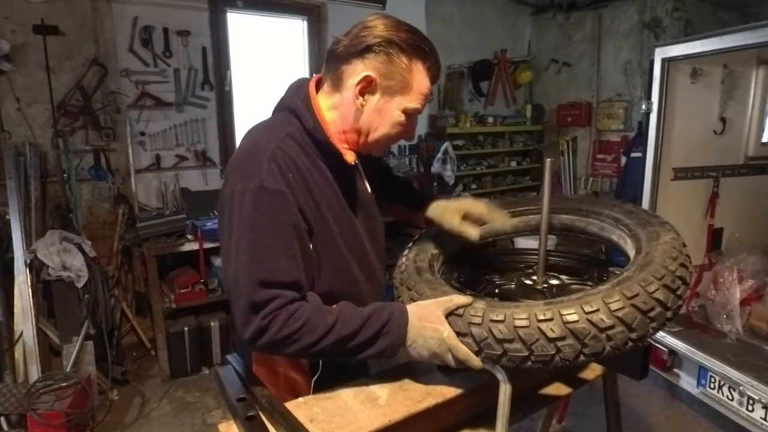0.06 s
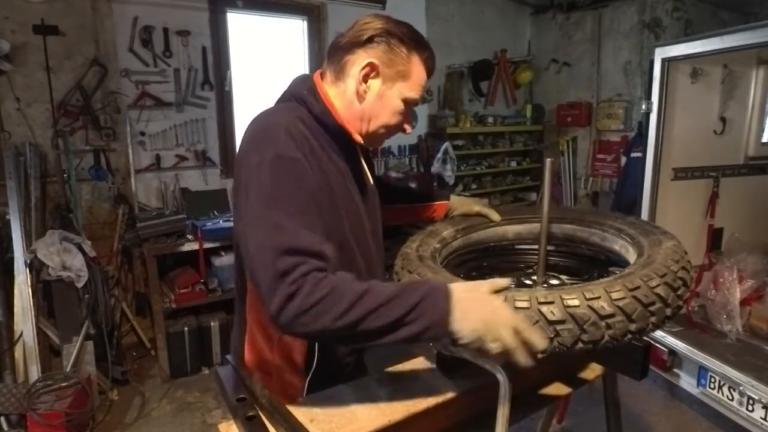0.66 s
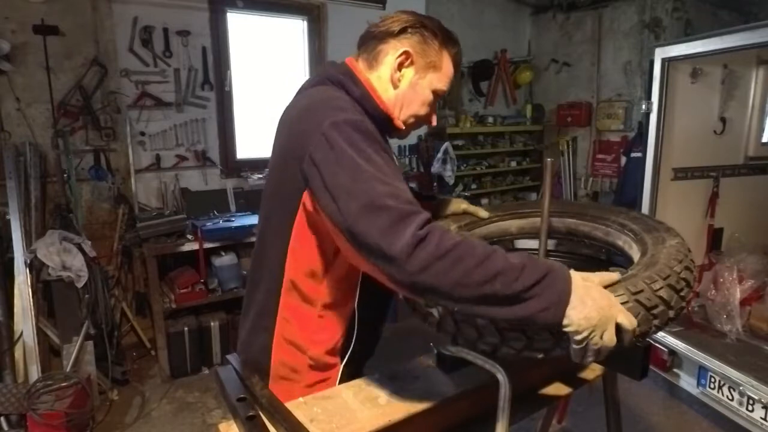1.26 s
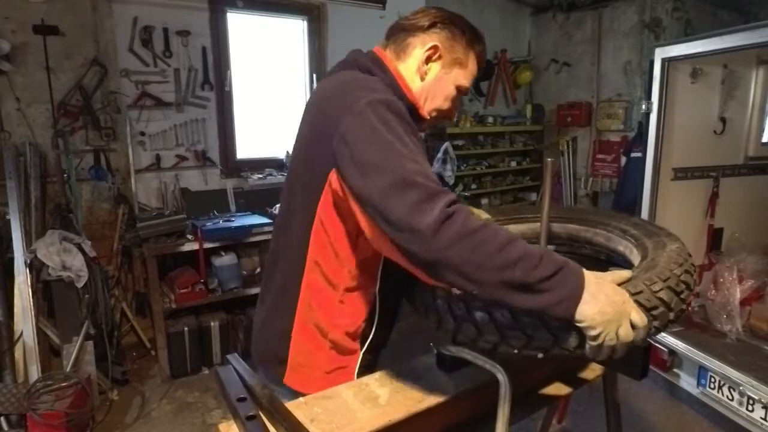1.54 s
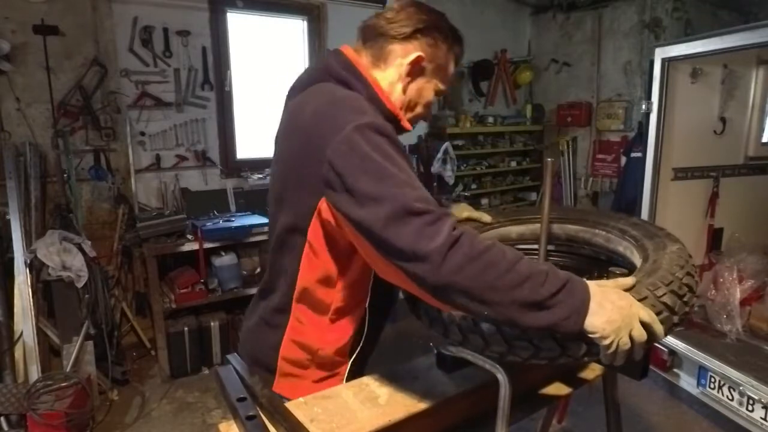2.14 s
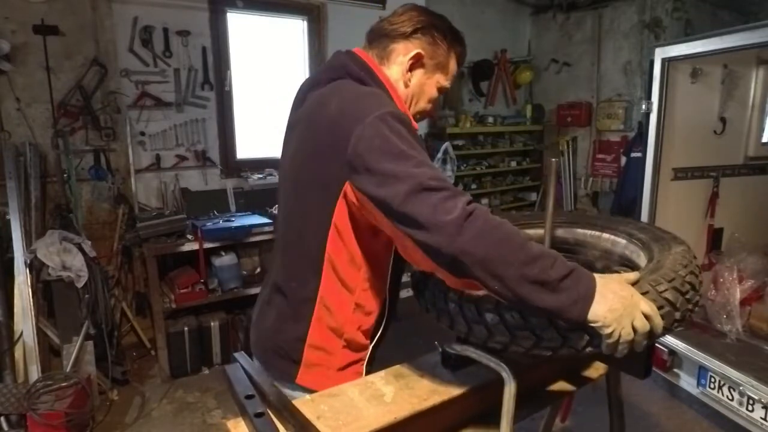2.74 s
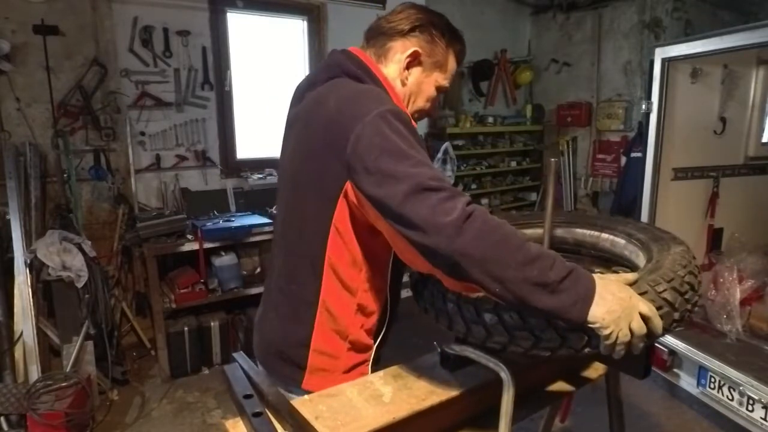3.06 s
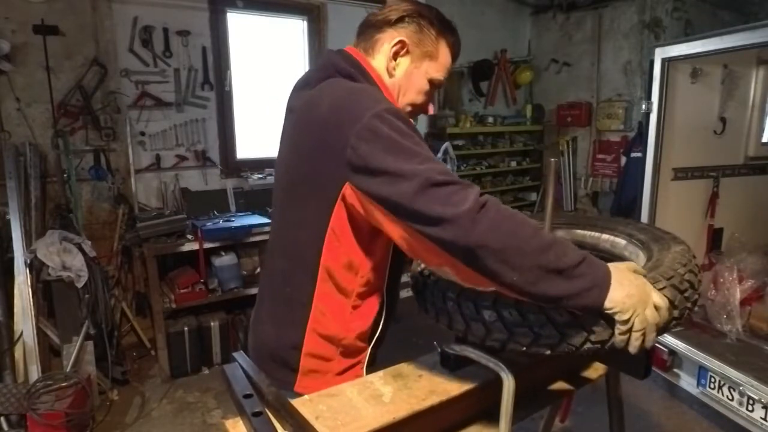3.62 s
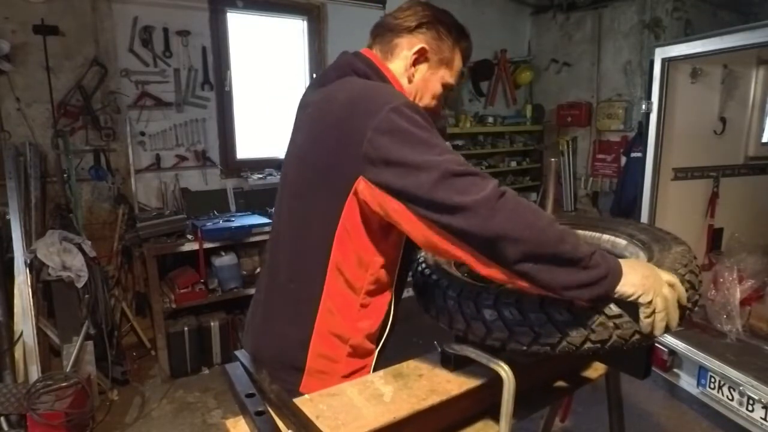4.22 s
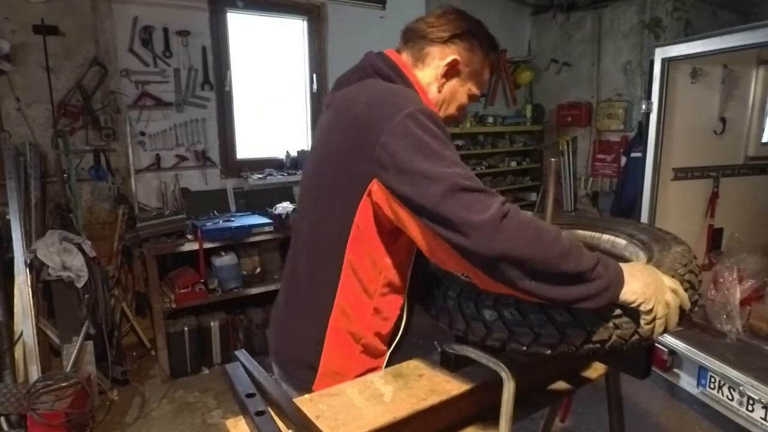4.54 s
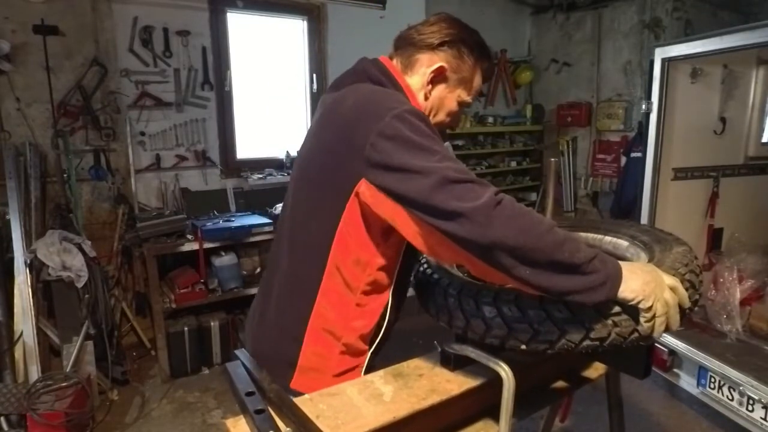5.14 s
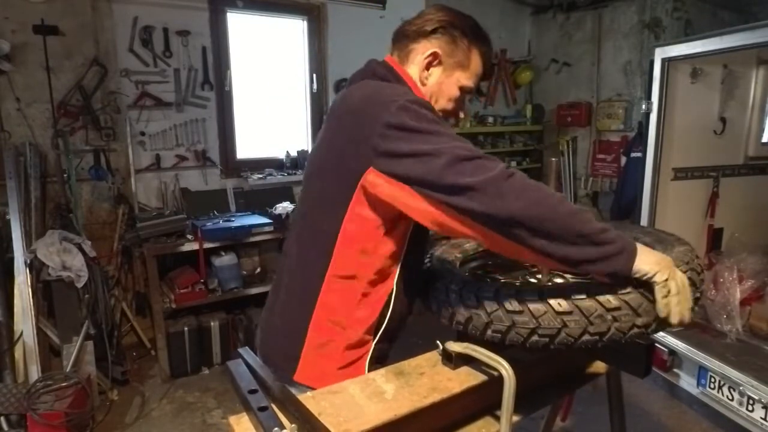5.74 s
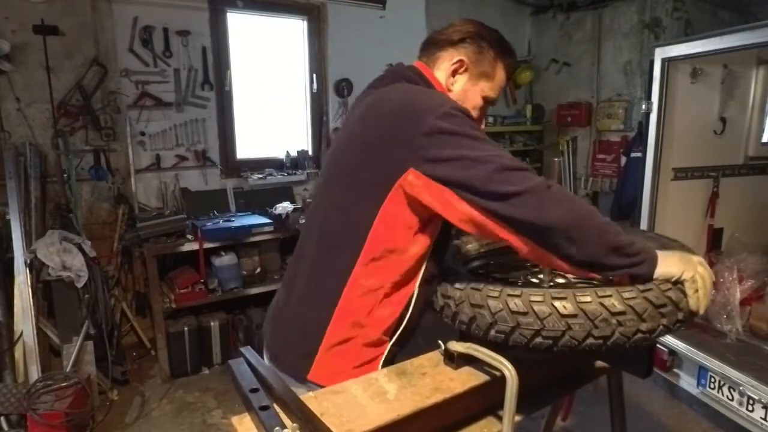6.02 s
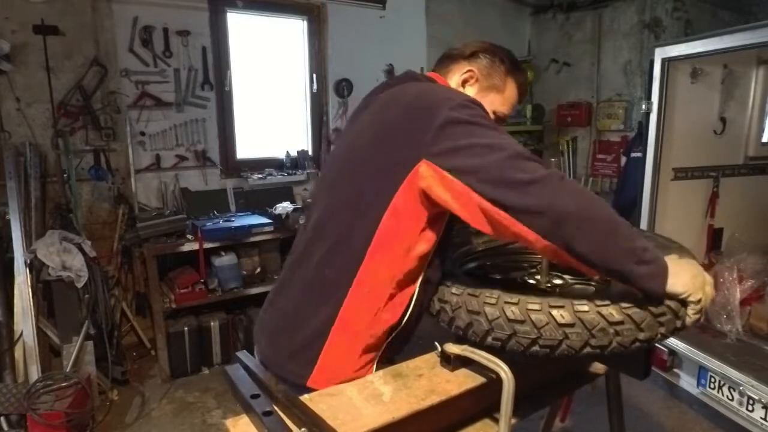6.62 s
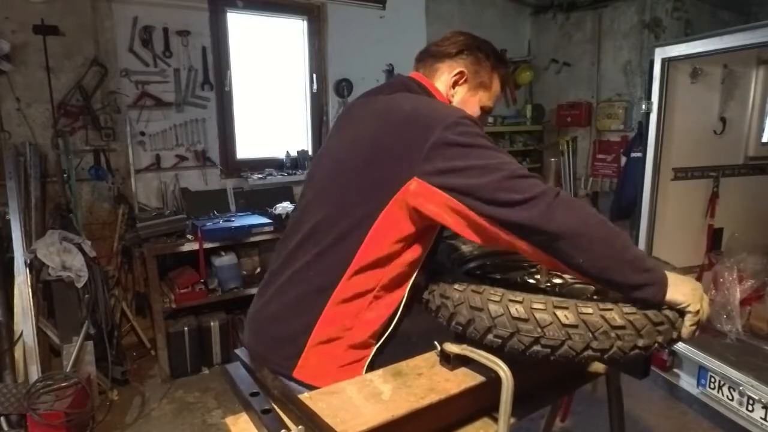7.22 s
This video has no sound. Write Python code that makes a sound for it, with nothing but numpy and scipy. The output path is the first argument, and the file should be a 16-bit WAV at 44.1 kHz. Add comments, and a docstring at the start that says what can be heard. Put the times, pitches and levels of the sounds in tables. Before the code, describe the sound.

A bright steel clink and a faint cloth rustle give way to scattered metal knocks and short scrapes as a wheel shifts on its spindle while a tyre is fitted. The knocks grow heavier, with thin spoke pings, until the hub lands with a hollow clonk. A busier run of knocks, skids and dull rubber thumps follows, making the stand boom, then eases off. A small workshop hums quietly underneath.

```python
"""Mounting a motorcycle tyre

In a small, humming workshop, hands push a tyre onto a spoked wheel that sits loosely on a steel spindle.
The hub knocks and scrapes on the spindle, setting the whole wheel ringing, and once drops onto its seat.
The rubber bead thumps over the rim, rim and spokes ping, and heavy knocks make the stand boom.
Early on, a steel part clinks and a sleeve brushes past."""
import sys
import numpy as np
from scipy import signal
from scipy.fft import rfft, irfft, next_fast_len
from scipy.io import wavfile

SR = 44100
rng = np.random.default_rng(int(sys.argv[2]) if len(sys.argv) > 2 else 0)


def dump(signal):
    """Clip the signal to [-1, 1] and save it as 16-bit WAV at the path in sys.argv[1]."""
    limited = np.clip(np.atleast_2d(signal).T, -1, 1)
    pcm = np.round(limited * 32767).astype(np.int16)
    wavfile.write(sys.argv[1], SR, pcm)


N = 325017
RING_TIME = np.arange(SR) / SR   # every contact gets one second to ring out


def from_db(db):
    """Decibels to gain."""
    return 10 ** (np.asarray(db) / 20)


def rms_one(x):
    """Scale to rms 1."""
    return x / np.sqrt(np.mean(x ** 2) + 1e-20)


def at_hz(curve, hz):
    """Read a curve on a log-frequency axis."""
    freqs, values = np.array(curve).T
    return np.interp(np.log(hz + 1e-9), np.log(freqs), values)


def add(out, s, sound):
    """Mix a sound in at s seconds."""
    start = round(s * SR)
    out[start:start + len(sound)] += sound[:max(N - start, 0)]


def attack(rise_s):
    """An onset that eases up to full level."""
    return 1 - np.exp(-RING_TIME / rise_s)


def decay(t60):
    """A tail that loses 60 dB in t60 seconds."""
    return np.exp(-np.log(1000) * RING_TIME / t60)


def equalise(x, curve, bass_db=0, treble_db=0):
    """Minimum-phase EQ, so nothing rings ahead of a hit: a unit-power curve plus two shelves."""
    size = 2 * next_fast_len(len(x) // 2 + 1)
    hz = np.arange(size // 2 + 1) * SR / size
    shelves = [(260, bass_db), (480, 0), (1050, 0), (3800, treble_db)]
    gain = rms_one(from_db(at_hz(curve, hz))) * from_db(at_hz(shelves, hz))
    cepstrum = irfft(np.log(gain))[:size // 2]
    cepstrum[1:] *= 2
    return irfft(rfft(x, size) * np.exp(rfft(cepstrum, size)))[:len(x)]


def mode_tones(modes):
    """One decaying complex tone for each mode."""
    return np.array([from_db(db) * decay(t60) * np.exp(2j * np.pi * hz * RING_TIME)
                     for hz, db, t60 in modes], np.complex64)


def strike(tones, spread_db):
    """Each contact point excites the modes with strengths and phases of its own."""
    strengths = from_db(spread_db * rng.standard_normal(len(tones)))
    phases = np.exp(2j * np.pi * rng.random(len(tones)))
    return ((strengths * phases).astype(np.complex64) @ tones).imag


def resonate(x, ring):
    """Play a sound through a ring of unit energy."""
    return signal.fftconvolve(x, ring / np.linalg.norm(ring))[:SR]


# Dark room tone: (frequency [Hz], relative level [dB])
ROOM_EQ = [(20, -22), (50, 2), (75, -11.5), (140, -7.5), (180, -13), (480, -19.5), (1400, -30), (2600, -42),
           (3300, -44.5), (4150, -33), (5700, -49.5), (7200, -54), (8500, -49), (14000, -61)]
# The hum beneath it: (frequency [Hz], rms level [dB])
HUM_TONES = [(48.6, -54.5), (99.5, -60.5)]


def room_tone(air_db=-53.5):
    """The workshop's bed: steady air and a low hum."""
    t = np.arange(N) / SR
    hum = sum(from_db(db) * np.sqrt(2) * np.sin(2 * np.pi * (hz * t + rng.random()))
              for hz, db in HUM_TONES)
    return hum + from_db(air_db) * equalise(rng.standard_normal(N), ROOM_EQ)


# Tail length of the free wheel and the room: (frequency [Hz], t60 [s])
WASH_DECAY = [(60, 0.77), (160, 0.57), (420, 0.4), (1100, 0.36), (2900, 0.35), (7700, 0.32)]


def wash(ripple=1):
    """Countless weak modes and wall reflections: octave bands of noise, the low ones dying last."""
    spectrum = rfft(rng.standard_normal(SR)) * ripple
    hz = np.arange(len(spectrum))
    octave = np.round(np.log2(np.maximum(hz, 64)))
    return sum(irfft(spectrum * (octave == k)) * decay(at_hz(WASH_DECAY, 2 ** k))
               for k in np.unique(octave))


def metal_hits(hits, modes, room_db, crowd_db, detune=0.075):
    """Metal rings in clear modes with weaker ones crowded round them; the room holds the pitches on."""
    out, tones = np.zeros(N), mode_tones(modes)
    crowd = mode_tones([(hz * np.exp(detune * rng.standard_normal()), db, t60 / 2)
                        for hz, db, t60 in modes[1:] for _ in range(4)])
    for s, level_db in hits:
        ping = strike(tones, spread_db=1) + from_db(crowd_db) * strike(crowd, spread_db=4)
        ping = ping * attack(0.0012)
        reverb = resonate(ping, wash())
        add(out, s, from_db(level_db) * (ping + from_db(room_db) * reverb))
    return out


# Clink cues: (time [s], level [dB])
CLINK_CUES = [(.214, -33.5), (1.125, -47), (2.346, -42.5), (2.386, -40.5)]
# The steel part's bright ring: (frequency [Hz], level [dB], t60 [s])
STEEL_RING = [(1214, -5.5, 0.14), (1807, -9, 0.066), (2336, -8, 0.047), (2945, -4.5, 0.039),
              (3550, -2, 0.032), (3800, -10, 0.045), (3770, -5, 0.091), (4100, 4, 0.07), (4360, 5, 0.048),
              (4520, -5.5, 0.11), (5020, -15, 0.14), (5980, -17.5, 0.1), (7770, -21.5, .06),
              (8850, -23, 0.04), (9770, -26, 0.043)]


def steel_clinks():
    """Light contacts set a steel part ringing."""
    return metal_hits(CLINK_CUES, STEEL_RING, room_db=-3, crowd_db=-5.5)


def stick_slip(length_s, swell_db, slips_per_s=190, spread_db=5, grit=0.016, taper=0.31):
    """Friction: uneven jerks of uneven size over fine grit, at least 10 ms long; rms 1."""
    gaps, sizes = rng.standard_normal((2, SR // 100))
    onsets = (np.cumsum(np.exp(0.5 * gaps)) * SR / slips_per_s).astype(int)
    force = grit * rng.standard_normal(SR)
    jerks = from_db(spread_db * sizes) * rng.choice([-1, 1], len(onsets))
    force[onsets[onsets < SR]] += jerks[onsets < SR]
    size = int(np.clip(length_s, 0.01, 1) * SR)
    envelope = from_db(np.linspace(0, swell_db, size)) * signal.windows.tukey(size, taper)
    return rms_one(force[:size] * envelope)


# Cloth passes: (start [s], end [s], level [dB])
SLEEVE_CUES = [(0.357, 0.862, -62.5), (1.96, 2.047, -65.5)]
# The cloth's soft rustle: (frequency [Hz], relative level [dB])
SLEEVE_EQ = [(150, 1.5), (900, 4), (2500, -5.5), (4300, 0.5), (7000, -21), (9500, -14), (14000, -42)]


def sleeve_brushes():
    """Cloth rubs in fine, fast slips that swell and fade."""
    out = np.zeros(N)
    for start, end, level_db in SLEEVE_CUES:
        rustle = stick_slip(end - start, swell_db=0, slips_per_s=710, spread_db=6, grit=0.26, taper=0.67)
        add(out, start, from_db(level_db) * rustle)
    return equalise(out, SLEEVE_EQ)


def mode_clusters(ripple_db=4.5, cluster_hz=70, full_depth_hz=2500):
    """Weak modes bunch up with gaps between them, most clearly in the treble: a gain for each Hz."""
    hz = np.arange(SR // 2 + 1)
    heights = rng.standard_normal(1000)
    ripple = np.interp(hz / cluster_hz, np.arange(len(heights)), heights)
    return rms_one(from_db(ripple_db * ripple * np.clip(hz / full_depth_hz, 0.5, 1)))


# The clear pitches of the whole wheel: (frequency [Hz], level [dB], t60 [s])
WHEEL_RING = [(147.3, -25.5, 0.48), (226.5, -32.5, 0.25), (429.7, -29, 0.56), (474.8, -19, 0.37),
              (576, -22.5, 0.4), (622, -32, 0.4), (654.8, -21.5, 0.23), (1373, -19.5, 0.16),
              (1409, -33, 0.9), (1506.7, -11.5, 0.077), (1688, -22, 0.39), (1872, -25.5, 0.26),
              (2156, -25.5, 0.24), (2490, -18.5, .25), (3750, -23, 0.069), (3970, -22.5, 0.39)]


def wheel_ring(shared_wash, modes_db=0, shared_power=0.26):
    """The wheel answers a contact: a wash that changes with the contact point, its modes and a crack."""
    body = np.sqrt(shared_power) * shared_wash + np.sqrt(1 - shared_power) * wash(mode_clusters())
    pitches = from_db(modes_db) * strike(mode_tones(WHEEL_RING), spread_db=3.5)
    crack = 0.7 * decay(0.042) * rng.standard_normal(SR)
    return body + pitches + crack


# The tone of wheel and room together: (frequency [Hz], relative level [dB])
WHEEL_EQ = [(30, -31.5), (80, -1.5), (160, -1.5), (350, -5.5), (620, -0.5), (1000, -5), (1550, -1),
            (2200, -8.5), (3200, -10), (4000, -5), (4900, -10.5), (6200, -27), (7200, -33.5), (8500, -27),
            (11000, -42), (14000, -58)]
MEDIUM_DB = -30.5   # a contact of medium force; the tone shifts either side of it


def wheel_tone(x, level_db, medium_bass_db, treble_db):
    """Rubber cushions light contacts: the harder the contact, the less of it is bass."""
    bass_db = medium_bass_db - 0.3569 * (level_db - MEDIUM_DB)
    return from_db(level_db) * equalise(x, WHEEL_EQ, bass_db, treble_db)


def scrape(shared_wash, length_s, level_db, treble_db, swell_db):
    """A run of slips keeps the wheel ringing."""
    ring = wheel_ring(shared_wash)
    rub = resonate(stick_slip(length_s, swell_db), ring)
    return wheel_tone(rub, level_db, medium_bass_db=-1.5, treble_db=treble_db)


# Drag cues: (start [s], end [s], level [dB])
DRAG_CUES = [(.874, 0.98, -49.5), (2.44, 2.517, -30), (2.621, 2.772, -46), (2.972, 3.025, -41),
             (3.08, 3.139, -51.5), (3.719, 3.822, -35.5), (4.618, 4.67, -44.5), (5.249, 5.355, -33.5),
             (5.808, 5.868, -33.5), (5.892, 5.925, -26), (6.08, 6.139, -26.5), (6.658, 6.702, -35.5),
             (7.029, 7.158, -46.5), (7.298, 7.334, -42)]


def hub_drags(shared_wash):
    """A push drags the hub along the spindle, building as it grows; stronger rubbing is brighter."""
    out = np.zeros(N)
    for start, end, level_db in DRAG_CUES:
        treble_db = -4 + 0.86 * (level_db - MEDIUM_DB)
        add(out, start, scrape(shared_wash, end - start, level_db, treble_db, swell_db=5.5))
    return out


# Hub hits, some with a skid: (time [s], level [dB], treble shelf [dB], skid length [s])
KNOCK_CUES = [(1.123, -51.5, 4.5, 0), (1.435, -35.5, -19.5, 0.18), (1.473, -52.5, 6.5, 0.0071),
              (1.649, -37, -3.5, 0), (2.418, -38, -5, 0), (2.502, -20, -0.5, 0),
              (2.533, -29.5, -1.5, 0.042), (2.74, -31.5, -11.5, 0), (3.153, -28, -4.5, 0.0022),
              (3.669, -40.5, -7, 0.015), (3.686, -31, 1, 0), (3.813, -34, 3, 0.0011),
              (3.903, -14.5, -1.5, 0.0014), (3.915, -23.5, -2.5, 0.12), (4.007, -28, -8.5, 0.0006),
              (4.449, -41, -9, 0.0012), (4.492, -37.5, 1.5, 0.098), (4.602, -37, -1, 0), (4.675, -21, 1, 0),
              (5.29, -36.5, -6, 0.00098), (5.381, -14.5, -1, 0.0019), (5.521, -20.5, -6, 0.12),
              (5.955, -19, -4.5, 0.086), (6.178, -18, -4.5, 0.077), (6.283, -22, -7.5, 0.095),
              (6.474, -27, -6, 0.14), (6.559, -29, -4, 0), (6.691, -18.5, 1, .14), (6.732, -24.5, -6, 0),
              (6.816, -24.5, -4, .11), (6.942, -26.5, -8, 0.063), (7.127, -34, -6.5, 0.013),
              (7.23, -37.5, -13.5, 0)]


def hub_knocks(shared_wash, held_decay_share=0.93, damped_above_hz=300, graze_db=-17):
    """The hub grazes the spindle, then hits home; the hands damp the metal's ring but not its low end."""
    out = np.zeros(N)
    low_pass = signal.butter(2, damped_above_hz, fs=SR, output="sos")
    grip = decay(at_hz(WASH_DECAY, 1000)) ** (1 / held_decay_share - 1)
    for s, level_db, treble_db, _ in KNOCK_CUES:
        modes_db = 1 - 0.12 * (level_db - MEDIUM_DB)   # a light tap rings purer
        ring = wheel_ring(shared_wash, modes_db) * attack(0.00099)
        low_end = signal.sosfilt(low_pass, ring)
        held = ring * grip + low_end * (1 - grip)
        knock = wheel_tone(held, level_db, medium_bass_db=1, treble_db=treble_db)
        graze_lead_s = 0.005 * rng.uniform(0.46, 1.8)
        add(out, s - graze_lead_s, from_db(graze_db) * knock)
        add(out, s, knock)
    return out


def thuds(hits, modes, rise_s):
    """A soft, heavy contact swells into a few low modes."""
    out, tones = np.zeros(N), mode_tones(modes)
    for s, level_db in hits:
        add(out, s, from_db(level_db) * strike(tones, spread_db=1) * attack(rise_s))
    return out


# Bead cues: (time [s], level [dB])
BEAD_CUES = [(1.124, -35), (1.458, -40), (2.418, -21), (2.535, -24), (3.156, -33), (4.525, -38.5),
             (4.68, -28), (6.772, -15), (6.781, -19.5), (6.818, -14.5), (6.831, -16.5), (6.885, -28),
             (6.945, -19.5)]
# The dull body of the rubber carcass: (frequency [Hz], level [dB], t60 [s])
TYRE_BODY = [(148, -10, 0.25), (212, -2, 0.079), (232, -3.5, 0.063), (251, 0, 0.04), (333, -7.5, 0.063),
             (398, -5.5, 0.032)]


def bead_thumps():
    """The rubber bead jumps over the rim and thumps the carcass."""
    return thuds(BEAD_CUES, TYRE_BODY, rise_s=0.0022)


def hub_skids(shared_wash, below_knock_db=10):
    """After some knocks the hub skids on, in a quieter scrape that dies away."""
    out = np.zeros(N)
    for s, knock_db, treble_db, length_s in KNOCK_CUES:
        if length_s > 0:
            add(out, s, scrape(shared_wash, length_s, knock_db - below_knock_db, treble_db, swell_db=-13))
    return out


# Rim cues: (time [s], level [dB])
RIM_CUES = [(1.651, -52), (3.155, -34), (4.676, -31.5), (6.795, -33), (6.825, -33)]
# The rim's thin chime: (frequency [Hz], level [dB], t60 [s])
RIM_RING = [(2440, -5.5, 0.23), (4260, 10.5, 0.067), (4210, 4, 0.071), (5170, -13, 0.096),
            (5320, -12.5, .12)]


def rim_chimes():
    """A nudge rings the rim in a few nearly pure pitches."""
    return metal_hits(RIM_CUES, RIM_RING, room_db=-3.5, crowd_db=-17.5)


# The stand's sub-bass: (frequency [Hz], level [dB], t60 [s])
STAND_BODY = [(44.8, 5.5, 0.84), (62.3, -2.5, 0.35)]


def stand_booms(heavy_db=-25, loose_db=-19, seated_db=-14):
    """Heavy knocks land the wheel's weight on the stand, harder once the hub drops onto its seat."""
    seated_s = DROP_CUES[0][0] - 0.05
    hits = [(s, db + (seated_db if s > seated_s else loose_db))
            for s, db, _, _ in KNOCK_CUES if db > heavy_db]
    return thuds(hits, STAND_BODY, rise_s=0.015)


# Spoke cues: (time [s], level [dB])
SPOKE_CUES = [(3.688, -30), (3.904, -27), (4.493, -38), (4.675, -26), (5.328, -29.5), (5.905, -31),
              (5.925, -39)]
# The spokes' wiry top end: (frequency [Hz], level [dB], t60 [s])
SPOKE_RING = [(3805, 6, 0.04), (4200, -15.5, .12), (4440, -3, 0.16), (4770, 1.5, 0.13), (4930, -2.5, 0.11),
              (5610, -12, 0.14), (8690, -50.5, .12)]


def spoke_pings():
    """The spokes ping in high, short-lived modes."""
    return metal_hits(SPOKE_CUES, SPOKE_RING, room_db=-5, crowd_db=-10.5)


# The hub seats: (time [s], level [dB])
DROP_CUES = [(5.382, -14.5)]
# The hub's hollow clonk: (frequency [Hz], level [dB], t60 [s])
HUB_BODY = [(635, 2, 0.15), (765, -1, 0.049)]


def hub_drop():
    """The hollow hub drops squarely onto its seat."""
    return thuds(DROP_CUES, HUB_BODY, rise_s=0.00096)


def scene():
    """The mono mix: one wheel carries knocks and scrapes, with bright metal above and thuds below."""
    shared_wash = wash()
    wheel = hub_knocks(shared_wash) + hub_drags(shared_wash) + hub_skids(shared_wash)
    metal = steel_clinks() + spoke_pings() + rim_chimes()
    weight = hub_drop() + bead_thumps() + stand_booms()
    return (wheel + metal + weight + sleeve_brushes() + room_tone())[None]


def record(dry, cutoff_hz=14900):
    """A steep low-pass takes off the very top."""
    return signal.sosfilt(signal.ellip(10, 0.1, 70, cutoff_hz, fs=SR, output="sos"), dry)


dry = scene()
out = record(dry)
dump(out)
```